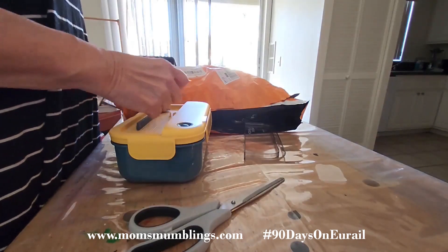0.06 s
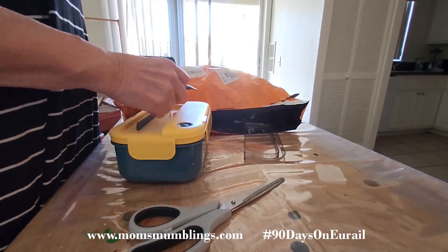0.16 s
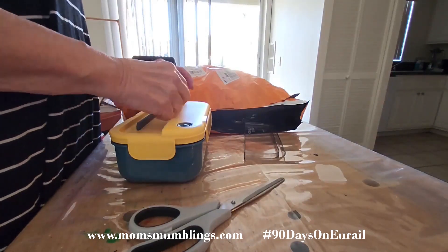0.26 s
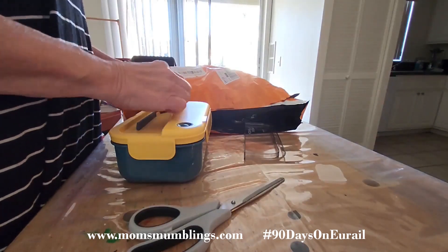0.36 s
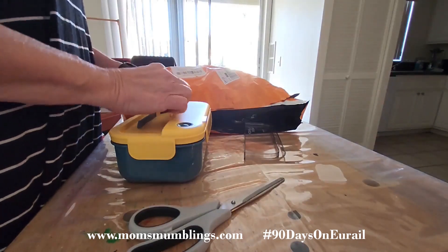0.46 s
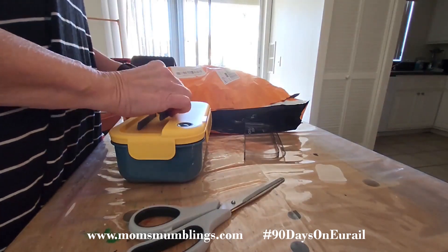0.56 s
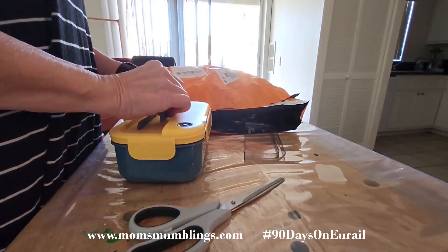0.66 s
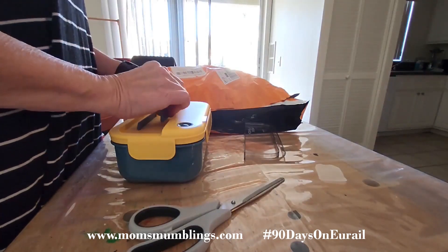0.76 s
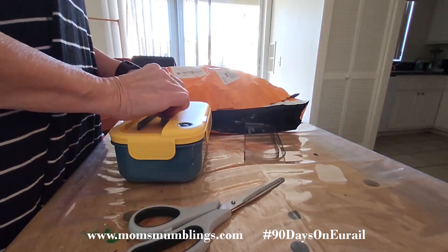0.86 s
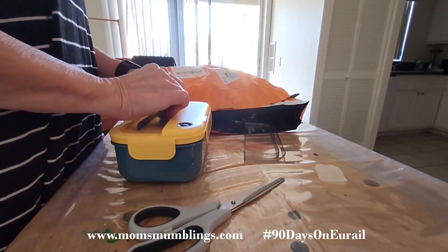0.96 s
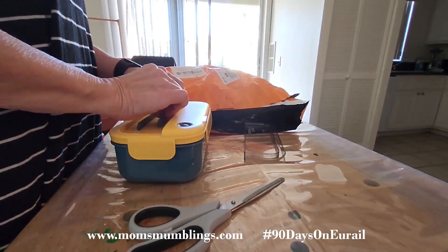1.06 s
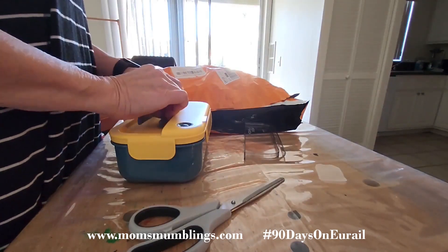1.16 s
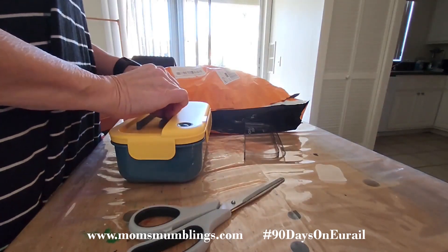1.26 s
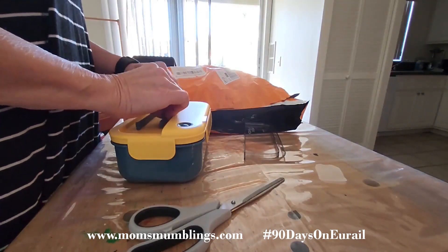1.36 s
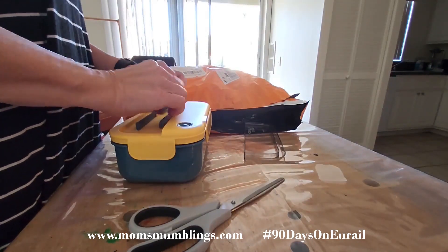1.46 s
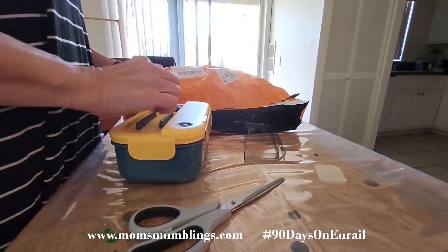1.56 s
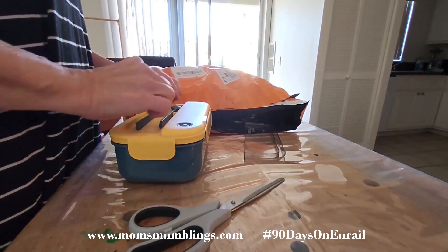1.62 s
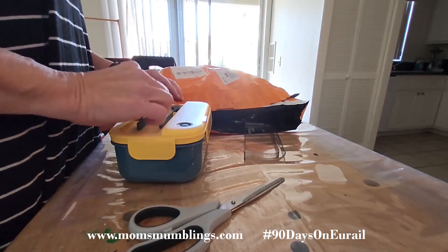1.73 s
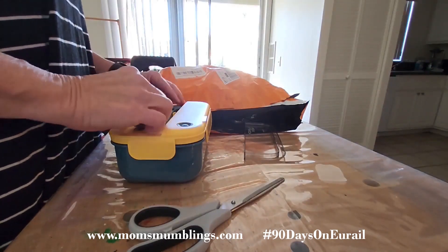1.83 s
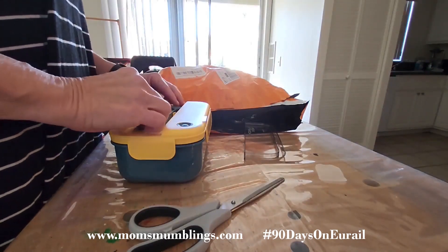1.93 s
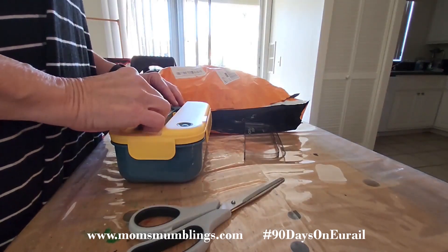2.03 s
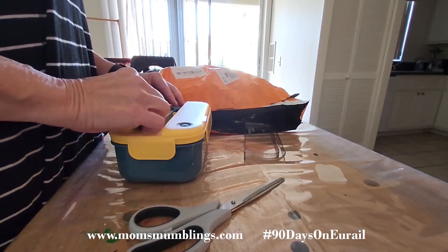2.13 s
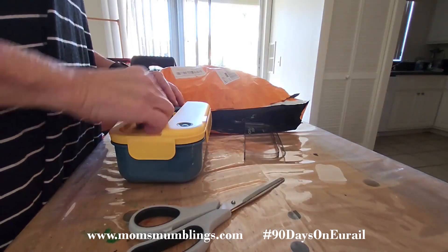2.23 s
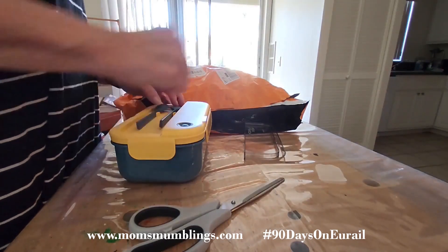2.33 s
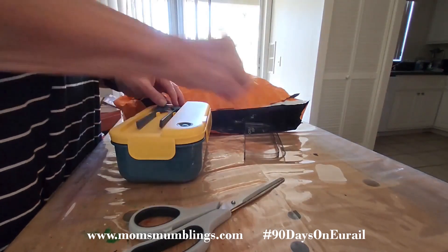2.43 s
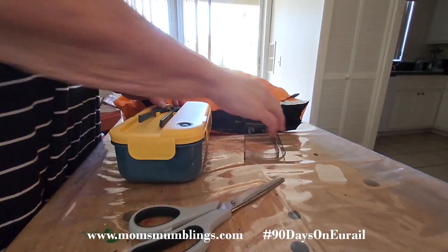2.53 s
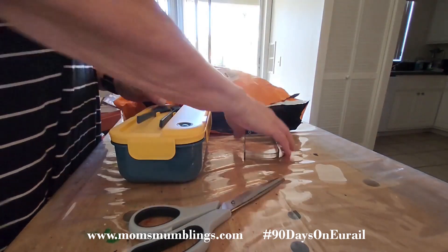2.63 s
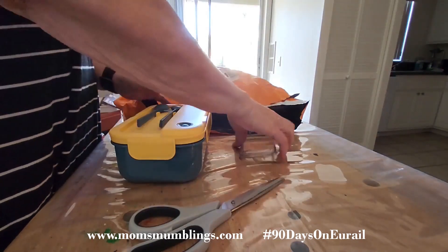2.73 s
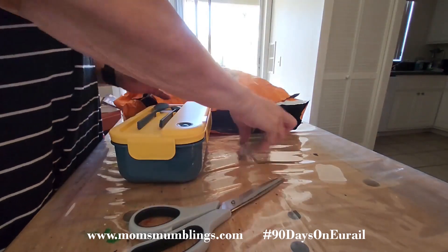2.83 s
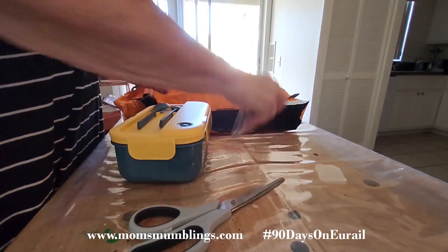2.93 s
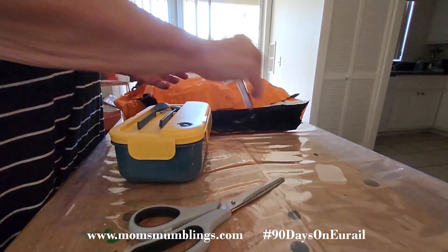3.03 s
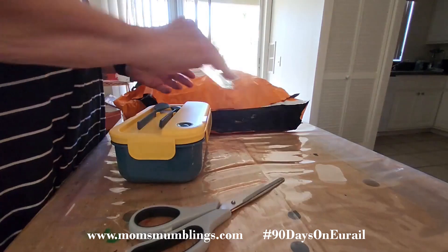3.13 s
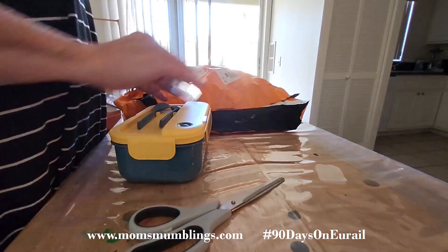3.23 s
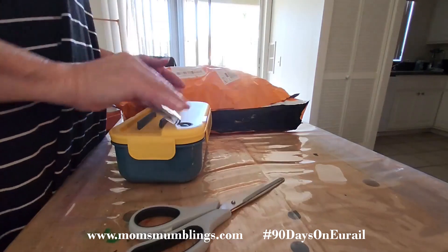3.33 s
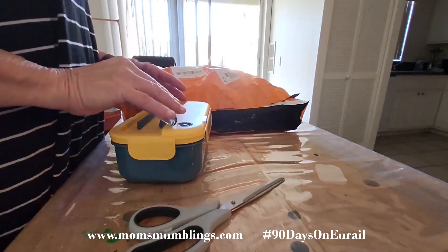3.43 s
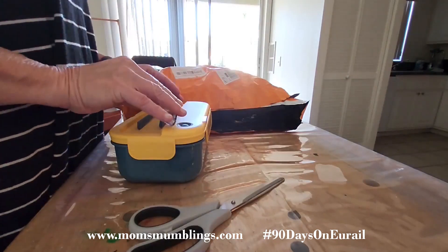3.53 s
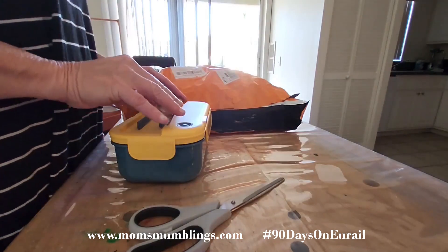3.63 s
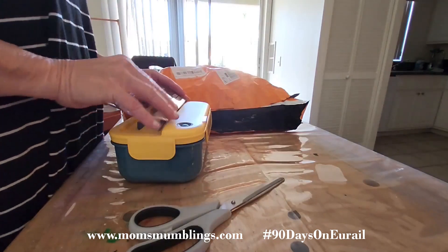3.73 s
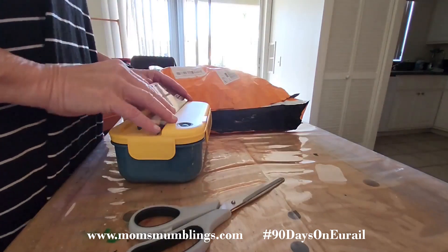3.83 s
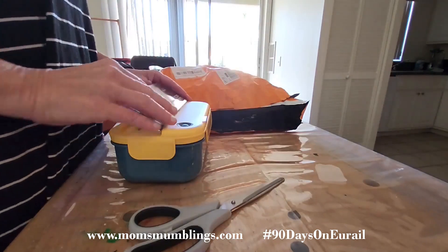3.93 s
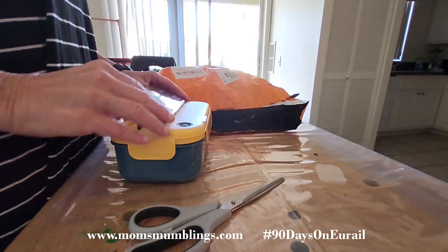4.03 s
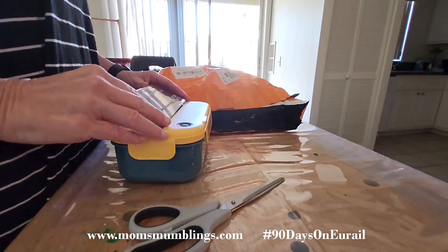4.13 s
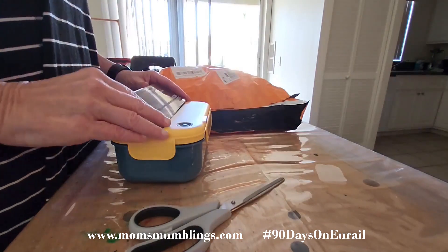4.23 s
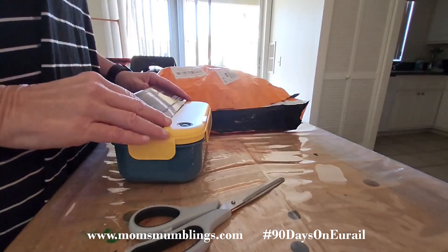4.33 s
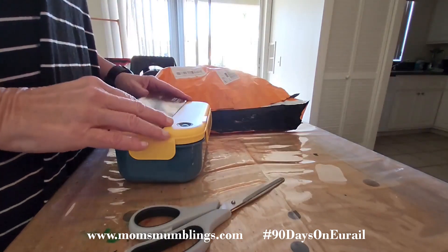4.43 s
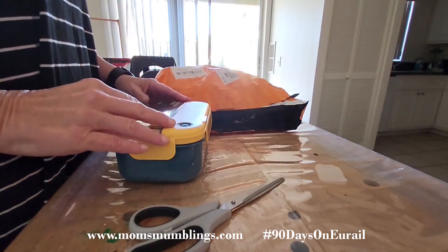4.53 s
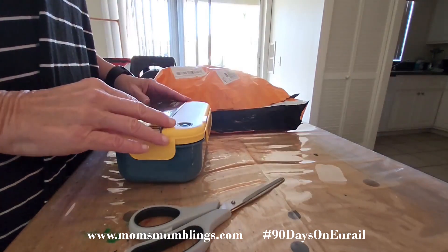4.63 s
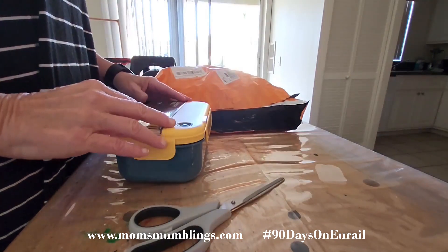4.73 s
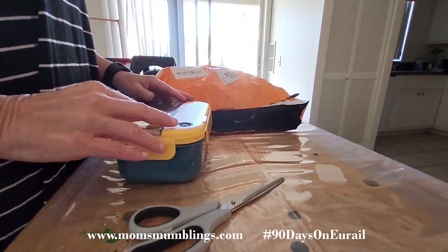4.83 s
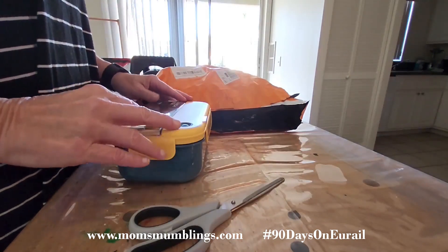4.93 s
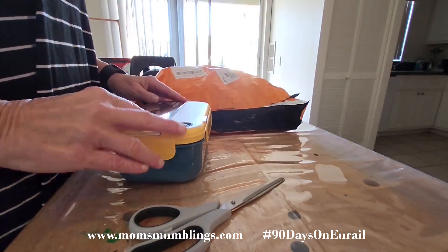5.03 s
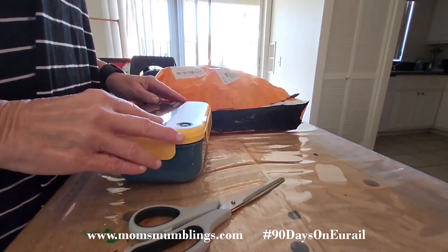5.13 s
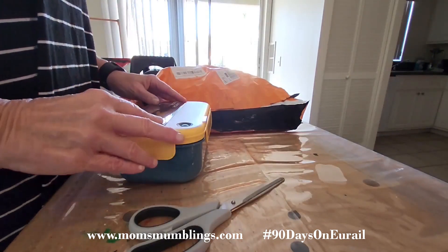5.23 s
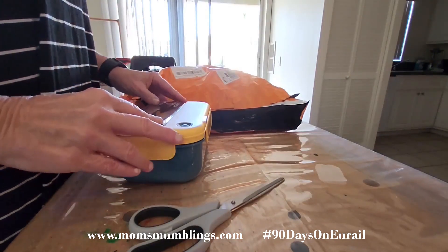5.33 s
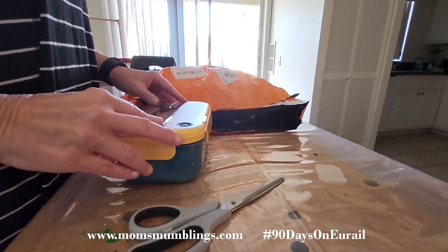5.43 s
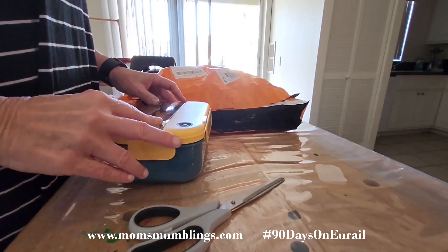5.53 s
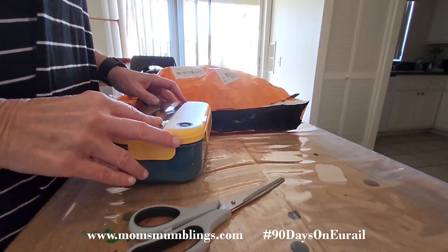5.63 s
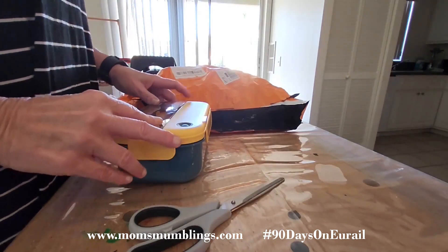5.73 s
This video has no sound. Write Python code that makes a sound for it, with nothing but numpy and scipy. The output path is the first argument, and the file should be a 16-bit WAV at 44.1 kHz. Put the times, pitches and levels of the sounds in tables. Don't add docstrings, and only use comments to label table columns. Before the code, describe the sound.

Hands press cutlery into the stiff lid of a hollow plastic lunch box with irregular clicks, thumps and soft finger rubs. After a quieter pause a thin plastic cover is picked up with a scrape, squeaks and a rattle, then laid on with knocks. It snaps shut with the loudest click, followed by a few small taps. Stereo microphone at arm's length in a small hard kitchen, over a low hum.

```python
import sys
import numpy as np
from scipy import signal
from scipy.fft import rfft, irfft, next_fast_len
from scipy.io import wavfile
from scipy.ndimage import uniform_filter1d

SR = 44100
rng = np.random.default_rng(int(sys.argv[2]) if len(sys.argv) > 2 else 0)


def dump_mix(stems):
    frames = np.atleast_2d(stems).T
    limited = np.clip(frames, -1, 1)
    pcm = np.round(limited * 32767).astype(np.int16)
    wavfile.write(sys.argv[1], SR, pcm)


def invert_db(level):
    return 10 ** (np.asarray(level, dtype=float) / 20)


N = 254456

# f/Hz, level/dB, t60/s
BASE_MODES = [(129.7, -14.5, 0.028), (173, -7.5, 0.1), (215, -15.5, 0.53), (260, 0, 0.1), (273, -2.5, 0.16),
              (300, -8.5, 0.016)]
WALL_MODES = [(354.6, -2, 0.2), (404.5, 0, 0.098), (445, -2, 0.17), (459.4, -9, 0.17), (504.3, -0.5, 0.15),
              (548, -11, 0.15), (657, -5.5, 0.075)]
LID_MODES = [(848, 1, 0.028), (944, -3.5, 0.061), (1056, -3.5, 0.052), (1215, 2, 0.03), (1313, 3, 0.034),
             (1750, 4.5, 0.0081)]
RIM_MODES = [(1990, -3.5, 0.075), (2034, -2.5, 0.056), (2500, 1, 0.05), (2630, -3, 0.054), (2950, -2, .02),
             (3100, 1, 0.008)]
COVER_MODES = [(538, -1, .06), (640, 0, .08), (1290, -6, 0.025), (1440, -6, .03), (1860, -4.5, .03),
               (2400, -3, .03), (3000, -5.5, 0.037), (3850, -4.5, .04), (4400, -5.5, .03), (5144, -7, .04),
               (5960, -11, .02), (7300, -11, .015)]
# f/Hz, density/dB per Hz
AIR = [(15, -34), (25, -3), (70, 3), (206, 5.5), (301, -15), (591, -19.5), (1740, -31), (2110, -22),
       (3160, -34), (16000, -44.5)]
# t/s, sway level/dB, rumble against sway/dB
SHAKES = [(.14, -57.5, 5.5), (0.418, -60, 11.5), (.69, -55, 4.5), (1.001, -61, 6), (1.28, -54, 8),
          (1.53, -53, 2), (2.62, -62.5, 13.5), (2.84, -50.5, -2.5), (3.2, -55, -12), (3.5, -62.5, 7),
          (3.85, -54, 3.5), (4.1, -54.5, 7), (4.45, -52.5, 0), (4.66, -50, 6), (5.09, -63.5, -0.5),
          (5.32, -50, 4.5), (5.499, -59, -10)]
# start t/s, length/s, pressure level/dB, speed as treble against box/dB
STROKES = [(0.0, 0.042, -49, -3), (0.377, 0.24, -61.5, -7), (0.662, 0.25, -62, -8.5),
           (0.97, 0.1, -50.5, -12.5), (1.212, 0.28, -52, -5), (1.56, 0.038, -60, -13),
           (1.861, 0.21, -59.5, -8), (2.216, 0.24, -67.5, -8), (2.592, 0.2, -66.5, 1.5),
           (2.803, 0.31, -80, -1), (2.891, 0.18, -58.5, 5.5), (3.096, 0.086, -84.5, 12.5),
           (3.326, 0.056, -80, 13), (3.488, 0.14, -50, -7.5), (3.789, 0.078, -52, -6.5),
           (3.952, 0.24, -58.5, -6), (4.244, 0.19, -55.5, -18), (4.385, 0.26, -61.5, -13.5),
           (4.507, 0.17, -45.5, -9), (4.627, 0.13, -53.5, -2), (5.083, 0.093, -63.5, -25),
           (5.271, 0.068, -63.5, 8), (5.496, 0.29, -87, -1)]
# start t/s, length/s, level/dB, centre f/Hz, width/octaves
DRAGS = [(0.005, 0.036, -71, 5500, 0.42), (0.465, 0.066, -48.5, 1374, 1.7),
         (0.477, 0.05, -62.5, 6600, 0.98), (0.641, 0.019, -68, 2500, .7), (0.972, 0.034, -40, 447, 0.63),
         (1.28, 0.12, -49.5, 3330, 0.37), (1.375, 0.0092, -47, 481, 0.37), (2.027, 0.03, -57.5, 3220, 0.68),
         (2.319, 0.077, -63.5, 1710, 1.6), (2.908, 0.061, -47, 4750, 0.85),
         (2.985, 0.073, -43.5, 5460, 1.6), (2.993, 0.069, -47, 610, 0.25), (3.008, 0.05, -32, 2135, 1.1),
         (3.332, 0.13, -56.5, 2520, 0.45), (3.345, 0.061, -57.5, 4670, 1.1),
         (3.591, 0.09, -50.5, 820, 2.48), (3.616, 0.11, -61.5, 5500, 0.85),
         (3.798, 0.13, -56.5, 6260, 0.88), (4.174, 0.14, -66, 4030, 1.2), (4.491, 0.19, -64, 2400, 0.32),
         (4.575, 0.1, -60, 5500, 0.9), (5.279, .02, -63, 2900, 1.4)]
# start t/s, length/s, level/dB, pitch f/Hz, width/octaves
SQUEAKS = [
    (2.418, 0.041, -71.5, 2060, 0.17),
    (2.911, 0.055, -44.5, 2150, 0.073),
    (3.055, 0.049, -60.5, 5170, 0.05),
    (3.075, 0.048, -53.5, 3830, 0.028),
    (3.842, 0.015, -53, 4840, 0.14),
    (5.627, 0.081, -66.5, 2130, 0.23),
]
# t/s, lid peak level/dB, rim peak level/dB, crack against rim/dB
CUTLERY_TICKS = [(0.103, -20, -26, -8.5), (0.435, -57, -74, -10), (0.461, -47, -72, -4.5),
                 (0.551, -37, -43, -8.5), (0.663, -30.5, -33, -22.5), (0.706, -29, -30, -13.5),
                 (0.877, -35, -35, -15.5), (0.991, -24, -32.5, -19.5), (1.008, -41, -43, -14.5),
                 (1.101, -47.5, -64.5, -15), (1.158, -48, -53.5, -21), (1.265, -35.5, -42.5, -15),
                 (1.275, -23, -23.5, -13), (1.283, -35, -41.5, -2), (1.387, -29, -39.5, -7.5),
                 (1.424, -22.5, -24.5, -11.5), (1.456, -40, -49, -16), (1.476, -29.5, -35.5, -33),
                 (1.497, -38, -42.5, -28.5), (1.611, -40.5, -56, -8.5), (1.883, -41.5, -42, -41),
                 (1.936, -44, -42.5, -13.5), (1.987, -36.5, -35, -9.5), (2.043, -48, -52, -13),
                 (2.326, -48, -78, -15)]
COVER_TICKS = [(2.589, -41.5, -58, -8), (2.617, -29.5, -33, -10), (2.623, -52, -35, -7.5),
               (2.796, -64, -55, -1.5), (2.829, -42, -38.5, -3.5), (2.846, -55, -46, 3.5),
               (2.904, -41.5, -56, -21), (2.972, -38, -33.5, -10), (3.019, -26, -29, -14),
               (3.038, -28.5, -41, -3.5), (3.492, -27, -26.5, -18), (3.509, -26.5, -44.5, -6),
               (3.813, -37.5, -42, -29), (3.939, -21.5, -30.5, -2), (3.954, -21, -29.5, -15),
               (4.086, -38, -70, -16), (4.268, -46, -69, -14.5), (4.373, -53.5, -66, -20),
               (4.397, -41.5, -52, -15), (4.618, -16.5, -18.5, -11.5), (4.626, -11, -15.5, -4),
               (4.641, -24.5, -21.5, -6), (5.095, -54, -66, -15), (5.112, -52.5, -68, -13),
               (5.299, -24.5, -34, 1), (5.377, -47.5, -42, -6.5)]
# edge resonance f/Hz, width/octaves, ring time factor, top of the crack level/dB
CUTLERY_EDGE = (3010, 0.68, 0.73, 2.5)
COVER_EDGE = (2400, 1.05, 1, -15.5)
# t/s, wall peak level/dB, centre
# of wall ringing f/Hz, base against wall/dB
THUMPS = [(0.104, -16.5, 388, -18), (0.382, -38, 360, -4.5), (0.436, -40, 503, -18),
          (0.46, -39, 432, -7), (0.483, -38, 413, -23), (0.556, -38, 367, -3.5),
          (0.6, -39.5, 357, -12), (0.663, -23, 472, -13), (0.703, -25.5, 409.6, -18),
          (0.855, -44, 427, -9), (0.878, -32.5, 481, -12), (0.983, -13.5, 394, -8),
          (1.101, -38.5, 366, -25), (1.23, -33.5, 495, -17), (1.264, -23, 409, -2),
          (1.388, -20, 510, -11.5), (1.425, -22.5, 496, -37), (1.478, -27, 492, -19),
          (1.499, -35, 497, -7), (1.568, -39.5, 480, -15), (1.608, -42, 494, -9),
          (1.882, -40.5, 524, -12), (1.936, -39, 368, -8.5), (1.989, -34, 384, -26),
          (2.009, -33.5, 376, -1), (2.331, -43.5, 344, -23), (2.368, -51.5, 428, -16),
          (2.443, -49, 497, -1.5),
          (2.59, -38, 415, -6.5), (2.62, -26.5, 459, -11), (2.799, -57.5, 404, 9),
                (2.903, -41.5, 470, -28), (2.973, -31, 490, -10.5), (3.017, -36.5, 655, -4),
                (3.048, -32, 542, -12), (3.492, -27, 499, -6.5), (3.812, -31, 454, -14.5),
                (3.9, -36, 440, -22), (3.941, -21, 486, -15.5), (3.954, -24.5, 364, -7.5),
                (4.086, -30, 446.4, -8), (4.275, -35, 470, -4.5), (4.397, -37.5, 500, -11.5),
                (4.437, -40, 500, -20), (4.481, -42.5, 511, -21), (4.523, -32.5, 462.5, -26.5),
                (4.549, -32.5, 469.5, -22.5), (4.586, -35.5, 463, -8), (4.6185, -8.5, 479, -9.5),
                (4.639, -16.5, 495, -11.5), (5.098, -45, 370, -0.5), (5.298, -26.5, 441, -2),
                (5.376, -35.5, 507, -21)]
# t/s, f/Hz, peak level/dB, t60/s
PINGS = [(0.483, 7000, -57, 0.018), (0.483, 2500, -53, .02), (0.550, 2840, -33, 0.015),
         (0.551, 7130, -56.5, 0.013), (0.643, 2500, -54, .015), (0.706, 3130, -34.5, .015),
         (0.706, 5200, -51, 0.013), (0.877, 3090, -42, .015), (1.158, 3000, -53, 0.013),
         (1.266, 1430, -32, .025), (1.275, 3660, -33, 0.013), (1.275, 6360, -42.5, 0.0095),
         (1.284, 4100, -38, .015), (1.284, 7500, -46.5, 0.0082), (1.388, 2900, -39, 0.013),
         (1.424, 3140, -35, 0.012), (1.424, 1080, -32, 0.015), (1.424, 5270, -39, 0.0079),
         (1.424, 8050, -44.5, 0.0061), (1.457, 3200, -45.5, .012), (1.476, 1400, -38, 0.018),
         (1.496, 3230, -43, 0.014), (1.611, 1027, -49, 0.019), (2.846, 4600, -48, .015),
         (3.004, 5120, -35, .025), (3.018, 1860, -28.5, .02), (3.492, 2500, -42, .015),
         (3.492, 1090, -39, .02), (4.086, 1050, -33, 0.013), (4.397, 2520, -52.5, .025),
         (4.541, 2500, -54.5, .03), (4.626, 5030, -25, 0.021), (4.641, 2500, -28, 0.022),
         (4.642, 5950, -33.5, .012)]
# start t/s, loudest t/s, end t/s, level/dB, centre of ringing f/Hz
RATTLES = [
    (2.91, 2.924, 2.94, -48.5, 4400),
    (2.975, 3.009, 3.01, -39.5, 3770),
    (2.995, 3.037, 3.056, -40.5, 800),
    (3.32, 3.353, 3.33, -69.5, 1300),
    (3.335, 3.363, 3.43, -57, 3530),
    (1.285, 1.302, 1.34, -49.5, 3370),
    (4.49, 4.57, 4.23, -58.5, 2400),
]
# f/Hz, t60/s, level against the direct sound/dB
ROOM = [(149, 0.2, -7), (386, 0.27, -4), (958, 0.41, -6.5), (2500, 0.32, -8), (5500, 0.34, 2.5),
        (10800, 0.19, 1.5)]
# delay/ms, level/dB
ECHOES = [(2.1, -12.5), (7.5, -14), (17, -13), (23, -15.5)]
# f/Hz, level/dB
PORT_LEAN = [(100, 0), (500, 0.8), (1200, 2.1), (2300, 7.5), (4500, -2.5), (8500, -7.5), (13000, 4.5)]


def unit(x):
    return x / np.sqrt(np.mean(x ** 2))


def on_log(table, hz, axis=1):
    table = np.array(table, float)
    return np.interp(np.log(np.maximum(hz, 1)), np.log(table[:, 0]), table[:, axis])


def shape(x, gain):
    n = next_fast_len(x.shape[-1])
    hz = np.arange(n // 2 + 1) * SR / n
    return irfft(rfft(x, n) * gain(hz), n)[..., :x.shape[-1]]


def bell(centre_hz, octaves):
    return lambda f: np.exp(-2 * (np.log2(np.maximum(f, 1) / centre_hz) / octaves) ** 2)


def walk(rate):
    hold = int(SR / rate)
    steps = np.repeat(rng.standard_normal(N // hold + 1), hold)
    return unit(uniform_filter1d(uniform_filter1d(steps, hold), hold)[:N])


def ring(modes, db, stretch, detune=0):
    hz, own_db, t60 = np.transpose(modes)[:, :, None]
    t60 = np.maximum(t60 * max(stretch, 0.05), 0.001)
    t = np.arange(int(min(np.max(t60) * 1.25, 0.25) * SR)) / SR
    sign = (-1.0) ** np.arange(len(modes))[:, None]
    decay = np.exp(-np.log(1000) * t / t60)
    sines = np.sin(2 * np.pi * hz * (1 + detune) * t)
    return np.sum(sign * invert_db(own_db + db) * decay * sines, axis=0)


def near(modes, centre_hz, fall_db):
    return -fall_db * np.abs(np.log2(np.array(modes)[:, :1] / centre_hz))


def add(out, s, sound, peak_db):
    i = int(s * SR)
    sound = sound[:N - i]
    out[i:i + len(sound)] += sound * invert_db(peak_db) / np.max(np.abs(sound))


def shakes(levels_db, rise_s, fall_s, rest_db):
    t = np.arange(0, N, 64) / SR
    late = t - np.array(SHAKES)[:, :1]
    swell = invert_db(levels_db)[:, None] * np.exp(-np.abs(late) / np.where(late < 0, rise_s, fall_s))
    level = np.sqrt(invert_db(rest_db) ** 2 + np.sum(swell ** 2, axis=0))
    return np.interp(np.arange(N) / SR, t, level)


def background():
    noise = rng.standard_normal((5, N))
    middle, ports, knock_mid, knock_side = noise[0], noise[1:3], noise[3], noise[4]
    _, sway_db, rumble_db = np.transpose(SHAKES)
    hum_hz = 57.0 + 5.3 * walk(6.7)
    hum = np.sqrt(2) * np.sin(2 * np.pi * np.cumsum(hum_hz) / SR)
    hum = hum * shakes(sway_db, rise_s=0.061, fall_s=0.14, rest_db=-68.5)
    knocks = knock_mid + 0.5 * np.array([knock_side, -knock_side])
    rumble = unit(shape(knocks, bell(110.0, 0.93)))
    rumble = rumble * shakes(sway_db + rumble_db, rise_s=0.063, fall_s=0.084, rest_db=-72.5)
    rumble += unit(shape(ports, bell(28.0, 0.81))) * invert_db(-77 + 3.3 * walk(7.5))
    air = unit(shape(ports + 3.9 * middle, lambda f: invert_db(on_log(AIR, f))))
    return hum + rumble + air * invert_db(-66.5 + 2 * walk(8.7))


def strokes(levels_db):
    grip_s, release_s = 0.0067, 0.045
    out = np.zeros(N)
    for (s, length, *_), db in zip(STROKES, levels_db):
        t = np.arange(int((length + 0.3) * SR)) / SR
        release = np.exp(-np.maximum(t - length, 0) / release_s)
        add(out, s, (1 - np.exp(-t / grip_s)) * release, db)
    return out


def rubbing():
    box_db, speed_db = np.transpose(STROKES)[2:]
    lid_db = box_db + speed_db
    hiss_db = box_db + 2.2 * speed_db - 7
    slips = [rng.standard_normal(N) * invert_db(4.8 * walk(60) + 5.09 * walk(14)) for _ in range(3)]
    stiff = LID_MODES + RIM_MODES[:5]
    box = ring(BASE_MODES + WALL_MODES, 0, 0.77)
    lid = ring(stiff, near(stiff, 1300.0, 4.4), 0.32)
    out = signal.fftconvolve(slips[0] * strokes(box_db), box / np.linalg.norm(box))[:N]
    out += signal.fftconvolve(slips[1] * strokes(lid_db), lid / np.linalg.norm(lid))[:N]
    hiss = unit(shape(slips[2], bell(5600.0, 1.3)))
    return invert_db(-5.5) * (out + hiss * strokes(hiss_db - 5.0))


def drags():
    out = np.zeros(N)
    rows = DRAGS + SQUEAKS
    grain = rng.standard_normal((len(rows), 8192))
    grain *= invert_db(4.3 * rng.standard_normal((len(rows), 128)).repeat(64, axis=1))
    t = np.arange(8192) / SR
    for (s, length, db, hz, octaves), noise in zip(rows, grain):
        swell = np.clip(t / (0.18 * length), 0, 1) * np.clip((length - t) / length, 0, 1)
        add(out, s, unit(shape(noise, bell(hz, octaves))) * swell, db + 4.5)
    return out


def ticks():
    out = np.zeros(N)
    rows = [tuple(r) + tuple(CUTLERY_EDGE) for r in CUTLERY_TICKS]
    rows += [tuple(r) + tuple(COVER_EDGE) for r in COVER_TICKS]
    chance = rng.standard_normal((len(rows), 4, len(LID_MODES), 1))
    grit = rng.standard_normal((len(rows), 1024))
    t = np.arange(1024) / SR - 0.001
    grit[:, np.argmax(t > 0)] = 4.3
    touch = np.hanning(14)
    top_fall = 1.9
    for row, draw, noise in zip(rows, chance, grit):
        s, lid_db, rim_db, crack_db, edge_hz, octaves, stretch, top_db = row
        lid = ring(LID_MODES, 2 * draw[0], 0.36 * stretch, draw[1] / 30)
        rim = ring(RIM_MODES, 2 * draw[2], 0.5 * stretch, draw[3] / 30)
        chatter = noise * (t > 0) * np.exp(-np.abs(t) / (0.00088 * max(stretch, 0.05)))
        long_chatter = chatter * np.exp(t / 0.0012) ** stretch
        top = shape(long_chatter, bell(10000.0, 1.3))
        add(out, s + 0.0004, np.convolve(lid, touch), lid_db + 0.5)
        add(out, s + 0.0004, rim, rim_db - 4.5)
        add(out, s - 0.0006, shape(chatter, bell(edge_hz, octaves)), rim_db + 0.5)
        add(out, s - 0.0006, shape(chatter, bell(4320.0, 1.0)), rim_db + crack_db + 5.0)
        add(out, s - 0.0006, top, rim_db + top_fall * crack_db + top_db + 3)
    return out


def thumps():
    out = np.zeros(N)
    push = np.hanning(int(0.0012 * SR))
    blows = THUMPS
    chance = rng.standard_normal((len(blows), 2, len(WALL_MODES), 1))
    for (s, db, hz, base_db), (size, tune) in zip(blows, chance):
        wall = ring(WALL_MODES, near(WALL_MODES, hz, 36.0) + 4.0 * size, 0.31, 0.017 * tune)
        base = ring(BASE_MODES, 4.5 * size[1:], 0.39, 0.0028 * tune[1:])
        add(out, s + 0.00067, np.convolve(wall, push), db - 4.0)
        add(out, s + 0.00043, np.convolve(base, push), db + base_db + 1.06)
    return out


def pings():
    out = np.zeros(N)
    for s, hz, db, t60 in PINGS:
        add(out, s, ring([(hz, 0, t60)], 0, 0.95), db)
    return out


def rattles():
    knocks_per_s, scatter_db, fall_db = 900, 4, 6
    out = np.zeros(N)
    t = np.arange(8192) / SR
    when = rng.random((len(RATTLES), 8192))
    size = rng.standard_normal((len(RATTLES), 8192))
    for (s, top, end, db, hz), dice, draw in zip(RATTLES, when, size):
        knocks = (dice < knocks_per_s / SR) * np.sign(draw[::-1]) * invert_db(scatter_db * draw)
        cover = unit(ring(COVER_MODES, near(COVER_MODES, hz, fall_db), 1))
        body = np.convolve(unit(knocks), cover)[:8192]
        swell = np.interp(t + s, (s, top, end), (0, 1, 0)) ** 1.3
        i = int(s * SR)
        out[i:i + 8192] += unit(body) * swell * invert_db(db)
    return out


def room(lag):
    t = np.arange(int(0.7 * SR)) / SR
    mid, side = rng.standard_normal((2, len(t)))
    out = np.zeros((2, len(t)))
    for hz in 60 * 2 ** np.arange(0, 8.1, 0.5):
        band = lambda f: np.maximum(0, 1 - np.abs(np.log2(np.maximum(f, 1) / hz)) * 2)
        apart = np.clip(hz / 1900.0, 0.6, 1)
        noise = shape(np.sqrt(1 - apart ** 2) * mid + apart * np.array([side, side[::-1]]), band)
        t60 = on_log(ROOM, hz)
        fall = np.exp(-np.log(1000) * t / t60) * (1 - np.exp(-t / 0.00067))
        level = invert_db(on_log(ROOM, hz, axis=2)) * np.sqrt(2 * np.log(1000) / (t60 * SR))
        out += noise * fall * level
    out[0, 0] += 1
    out[1, lag] += 1
    for k, (ms, db) in enumerate(ECHOES):
        ms = ms * rng.uniform(0.7, 1.4)
        i = int(ms * SR / 1000)
        out[0, i] += invert_db(db)
        out[1, i + (-1) ** (k + 1) * lag] += invert_db(db)
    return out


def scene():
    box = thumps() + ticks() + drags() + rubbing()
    rooms = [room(lag) for lag in (12, 7)]
    kitchen = background()
    box = box + pings() + rattles()
    box = shape(box, lambda f: 1 / np.sqrt(1 + (153.0 / np.maximum(f, 1)) ** 6))
    turn = np.cos(np.pi * np.arange(N) / SR / 1.3) ** 2
    wet = np.zeros((2, N))
    for share, path in zip((turn, 1 - turn), rooms):
        wet += signal.fftconvolve((box * share)[None], path, axes=1)[:, :N]
    return wet * invert_db(5.0) + kitchen


def roll_off(x):
    return signal.sosfilt(signal.butter(12, 16500, fs=SR, output="sos"), x)


def record(dry):
    ports = []
    for x, side in zip(dry, (1, -1)):
        ports.append(shape(x, lambda f: invert_db(side * on_log(PORT_LEAN, f) / 2) * (f < 15900)))
    return roll_off(np.array(ports))


dry = scene()
out = record(dry)
dump_mix(out)
```